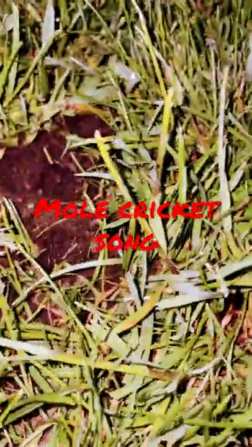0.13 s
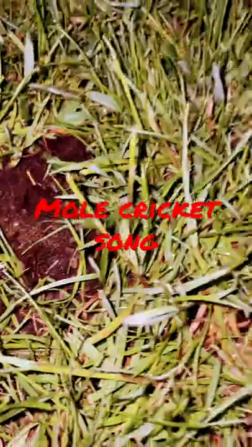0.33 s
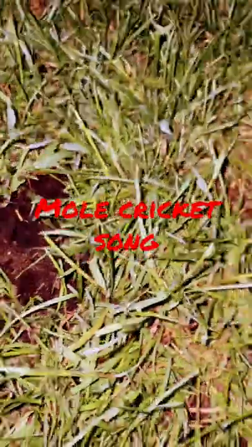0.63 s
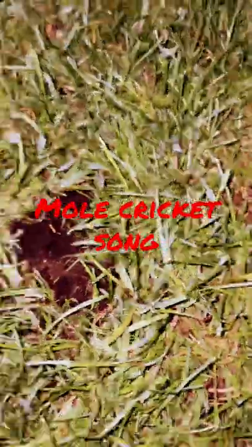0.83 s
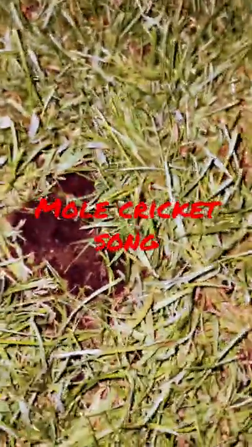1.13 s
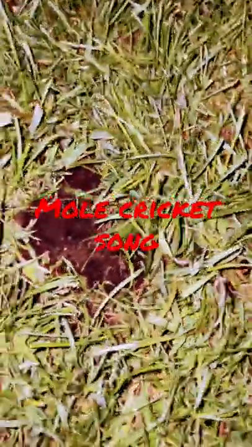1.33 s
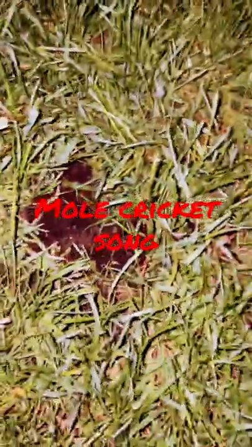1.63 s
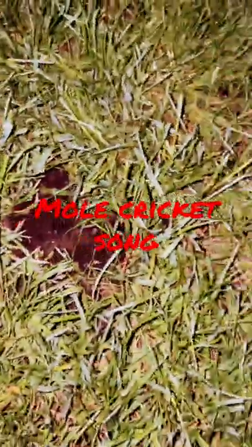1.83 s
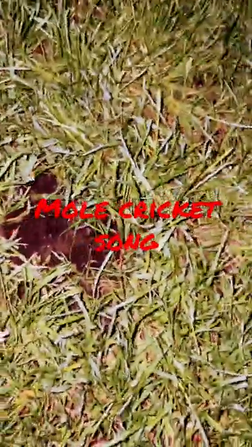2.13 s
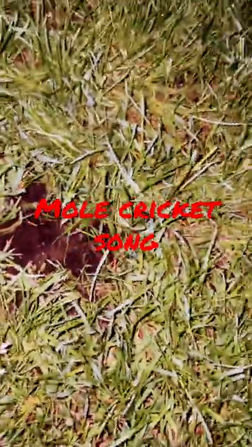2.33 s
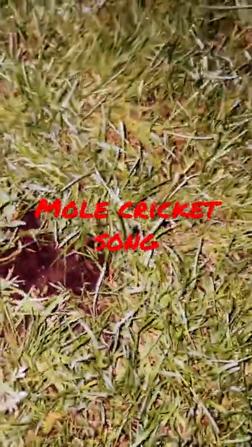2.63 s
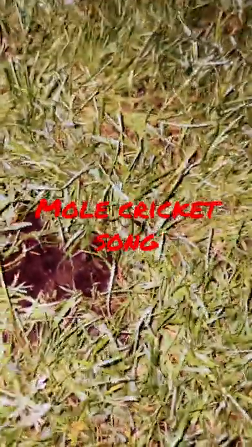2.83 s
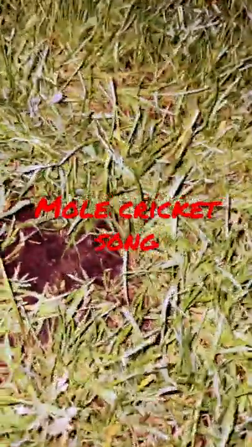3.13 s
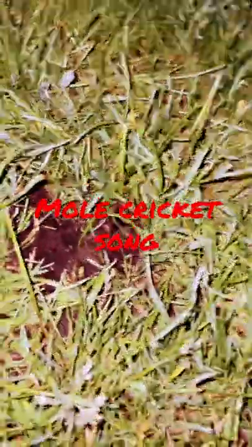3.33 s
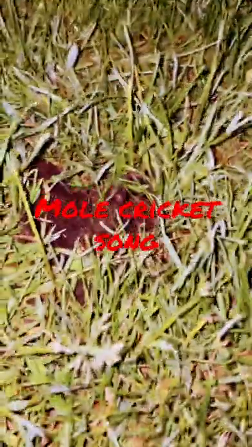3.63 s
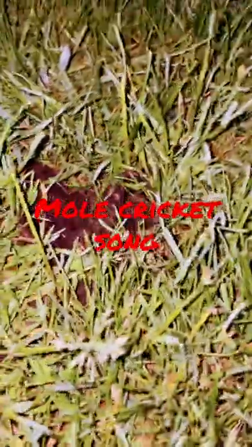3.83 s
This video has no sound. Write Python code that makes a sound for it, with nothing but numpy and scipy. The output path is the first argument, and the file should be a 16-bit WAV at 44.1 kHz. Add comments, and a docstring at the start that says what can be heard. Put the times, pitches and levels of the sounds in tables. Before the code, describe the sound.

A mole cricket churrs a steady mid-pitched buzzing trill from its burrow, then stops short.

```python
"""A mole cricket churrs from its burrow in a lawn, about forty wing strokes a second, and stops short.
Each stroke is a sine at the tooth rate ringing in wing and horn, with overtones, noisy scrape and echo.
Grass swishes close by as dense random snaps; soft footfalls thud as dying sines in the soil.
Far traffic and air are coloured noise, and a faint hum of narrow noise wavers.
A handheld stereo microphone points down at the burrow."""
import sys
import numpy as np
from scipy import signal
from scipy.fft import rfft, irfft
from scipy.io import wavfile
from scipy.ndimage import uniform_filter1d

SR = 44100
rng = np.random.default_rng(int(sys.argv[2]) if len(sys.argv) > 2 else 0)


def wav_out(sig):
    """Save sig, one row per channel (or a flat mono array), as 16-bit PCM at SR to the path in sys.argv[1]."""
    wavfile.write(sys.argv[1], SR, np.round(np.clip(np.atleast_2d(sig).T, -1, 1) * 32767).astype(np.int16))


N = 176400  # samples, 4 s


def amp(db):
    """Turn decibels into an amplitude factor."""
    return 10 ** (np.asarray(db) / 20)


def rms_one(x):
    """Scale a signal to an RMS of 1."""
    return x / np.sqrt(np.mean(x ** 2) + 1e-20)


def at_hz(points):
    """Read a curve of (Hz, value) points at every FFT bin, on a log frequency axis."""
    hz, value = np.transpose(points)
    bin_hz = np.arange(N // 2 + 1) * SR / N
    return np.interp(np.log(bin_hz + 1), np.log(hz), value)


def colour(x, spectrum):
    """Shape white noise to a spectrum, keeping its power."""
    gain = amp(at_hz(spectrum))
    return irfft(rfft(x) * gain / np.sqrt(np.mean(gain ** 2)), N)


def drift(rate):
    """Smooth random wander of RMS 1: noise through two equal one-pole low-passes at this rate in Hz."""
    r = np.exp(-2 * np.pi * rate / SR)
    noise = rng.standard_normal(N + SR)
    return rms_one(signal.lfilter([1], [1, -2 * r, r * r], noise)[SR:])  # the filter settles first


def resonance(x, hz, width_hz):
    """Ring at one frequency: a two-pole band-pass with a peak gain near 1."""
    r = np.exp(-np.pi * width_hz / SR)
    poles = [1, -2 * r * np.cos(2 * np.pi * hz / SR), r * r]
    return signal.lfilter([(1 - r * r) / 2, 0, (r * r - 1) / 2], poles, x)


def stereo(mid, side, pan_db=0):
    """Make left and right from middle and side; pan_db is left over right."""
    return np.array([(mid + side) * amp(pan_db / 2), (mid - side) * amp(-pan_db / 2)])


def scatter(x, t60):
    """A short diffuse echo: convolve with dying noise, partly different in each channel."""
    echo_width = 0.36
    t = np.arange(SR // 5) / SR
    mid, side = rng.standard_normal((2, len(t))) * amp(-60 * t / t60)
    tail = stereo(mid, echo_width * side)
    tail = tail / np.sqrt(np.sum(tail ** 2, axis=1, keepdims=True))
    return signal.fftconvolve(x, tail, axes=1)[:, :N]


def wavering_hum():
    """Noise through two equal narrow resonances, so that level and pitch waver by chance."""
    hum_hz, width_hz, level_db = 383.6, 11, -64.5
    hum = resonance(rng.standard_normal(N), hum_hz, width_hz)
    hum = resonance(hum, hum_hz, width_hz)
    return amp(level_db) * rms_one(hum)


def far_traffic_and_air():
    """Coloured noise rumbles and slowly changes colour, with independent side noise and the hum on top."""
    # Spectra of middle and side: pitch_hz, density_db (relative, per Hz)
    far_mid_spectrum = [(25, -32), (40, -17), (58, 2), (90, -4), (130, -8), (230, -10.5), (330, -15.5),
                        (500, -10.5), (800, -16.5), (1150, -30.5), (1600, -40), (5000, -44.5),
                        (8000, -55.5), (10000, -69.5), (16000, -71)]
    far_side_spectrum = [(20, -24.5), (70, -12), (140, -11), (350, -3.5), (500, -1.5), (800, 0.5),
                         (1150, -5.5), (1500, -18), (4800, -29), (8000, -36.5), (16000, -46)]
    # Change of the rumble's colour by the end: pitch_hz, gain_db
    late_colour = [(60, 0), (110, 0.5), (200, 4.5), (330, 2), (550, -7), (1000, 3.5), (2000, 2)]
    # Lean of the middle to the left: pitch_hz, share (negative leans right)
    left_lean = [(100, 0), (400, -0.14), (800, -.12), (1500, 0.013)]
    mid_db, side_db = -52, -61
    flicker_db, flicker_hz = .35, 4
    level = amp(mid_db + flicker_db * drift(flicker_hz))
    rumble = level * colour(rng.standard_normal(N), far_mid_spectrum)
    recoloured = irfft(rfft(rumble) * amp(at_hz(late_colour)), N)
    rumble = rumble + np.arange(N) / N * (recoloured - rumble)  # crossfade over the whole scene
    mid = rumble + wavering_hum()
    side = amp(side_db) * colour(rng.standard_normal(N), far_side_spectrum)
    side = side + irfft(rfft(mid) * at_hz(left_lean), N)
    return stereo(mid, side)


def footfalls():
    """Dull thuds in the soil: each step sets off three dying sines, the lowest building up latest."""
    # Steps: start_s, level_db, low_delay_s (lag of the lowest mode)
    steps = [(.787, -37, .012), (2.35, -34, .002), (2.859, -50, 0)]
    # Soil modes: pitch_hz, level_db (added to the step's), t60_s, build_up_s
    soil_modes = [(72, 7, .075, 0.014), (275, -3.5, 0.061, 0.001), (640, 2, .02, 0.0013)]
    out = np.zeros(N)
    for start_s, step_db, low_delay_s in steps:
        for hz, mode_db, t60, build_up_s in soil_modes:
            delay_s = low_delay_s * (hz < 100)  # only the lowest mode lags
            t = np.maximum(np.arange(N) / SR - start_s - delay_s, 0)
            envelope = amp(step_db + mode_db - 60 * t / t60) * (1 - np.exp(-(t / build_up_s) ** 2))
            out += envelope * np.sin(2 * np.pi * hz * t)
    return out


def grass_texture():
    """Tiny snaps of blades: random impulses of uneven strength and either sign, blended with noise."""
    # Spectra of middle and side: pitch_hz, density_db (relative, per Hz)
    grass_mid_spectrum = [(1000, -1), (1600, -7.5), (2560, 3), (3400, -2), (4300, -7), (5000, -9.5),
                          (5800, -6.5), (7200, -11), (8200, -23), (9400, -48.5), (14200, -52.5),
                          (15300, -24.5)]
    grass_side_spectrum = [(1000, -6), (1850, -2), (2400, -13.5), (2800, -0.5), (4700, -11.5), (6500, -7),
                           (10300, -7), (12800, -21.5), (14400, -7), (16000, -11.5)]
    snaps_per_s, spread_db, side_db = 5400, 4.5, -1.5
    struck = rng.random((2, N)) < snaps_per_s / SR
    strength = amp(spread_db * np.minimum(rng.exponential(1, (2, N)), 4))
    snaps = struck * strength * rng.choice([-1, 1], (2, N))
    snaps = rms_one(rms_one(snaps) + rng.standard_normal((2, N)))
    side = amp(side_db) * colour(snaps[1], grass_side_spectrum)
    return stereo(colour(snaps[0], grass_mid_spectrum), side)


def grass():
    """Blade snaps swell and fade with each swish over a faint steady bed, in a dull and a bright band."""
    # Swishes: peak_s, rise_s, fall_s, level_db, bright_db (extra in the bright band), pan_db (L-R)
    swishes = [(.79, 0.077, 0.047, -60.5, 0.5, 0), (1.14, 0.052, 0.095, -58, -1.5, 1),
               (1.96, 0.09, 0.23, -60.5, 1, 1.5), (2.302, 0.19, 0.31, -64, 1.5, -1.5),
               (2.561, 0.035, 0.051, -55.5, 2.5, 1), (2.609, 0.027, 0.058, -58.5, 6.5, -0.5),
               (2.72, 0.073, 0.046, -59, -5, 1), (2.814, 0.061, 0.051, -56, 1.5, -1.5),
               (2.9, 0.033, 0.035, -68, 0, 1), (3.15, 0.072, 0.053, -61, 0.5, 1),
               (3.23, 0.043, 0.096, -69.5, -3, 0), (3.49, 0.063, 0.15, -69, 2, 1.5),
               (3.89, 0.035, .05, -73.5, -10, -6)]
    split_hz, bed_db = 4500, -76
    flutter_db, flutter_hz = 1.2, 25
    t = np.arange(N) / SR
    texture = grass_texture()
    high = signal.sosfilt(signal.butter(4, split_hz, "high", fs=SR, output="sos"), texture)
    low = signal.sosfilt(signal.butter(4, split_hz, fs=SR, output="sos"), texture)
    # overlapping swishes add as power
    dull_power, bright_power = np.full((2, 2, N), amp(bed_db) ** 2)
    for peak_s, rise_s, fall_s, level_db, bright_db, pan_db in swishes:
        swell = np.exp(-((t - peak_s) / np.where(t < peak_s, rise_s, fall_s)) ** 2)
        channel_db = level_db + np.array([[pan_db], [-pan_db]]) / 2
        power = swell ** 2 * amp(channel_db) ** 2
        dull_power = dull_power + power
        bright_power = bright_power + power * amp(bright_db) ** 2
    dull_flutter = amp(flutter_db * drift(flutter_hz))
    bright_flutter = amp(flutter_db * drift(flutter_hz))
    return dull_flutter * np.sqrt(dull_power) * low + bright_flutter * np.sqrt(bright_power) * high


def stroke_force(stroke_db, length_s, sag, since, along, jitter_hz):
    """Force of the wing: a shove as the stroke sets off, a sag along it, a quick catch and release."""
    drive_db, shove_db, shove_s, jitter_db = -0.3, 6, .003, .9
    sag_start, sag_end = .1, .72  # shares of the stroke; the sag goes on at the same slope
    attack_s, attack_from = .0022, .15  # force builds from this share
    release_s, release_lead_s = .0018, .0024  # letting go begins this long before the stroke's end
    shove = shove_db * np.exp(-since / shove_s)
    force = amp(stroke_db + drive_db + shove + jitter_db * drift(jitter_hz))
    force = force * np.maximum(1 - sag * np.maximum(along - sag_start, 0) / (sag_end - sag_start), 0)
    attack = 1 - (1 - attack_from) * np.maximum(1 - since / attack_s, 0)
    release = np.clip((length_s + release_s - release_lead_s - since) / release_s, 0, 1)
    return force * attack * release


def tooth_phase(stroke_hz, along, jitter_hz):
    """Phase of the passing teeth: their rate starts a little high, jitters and slows late in the stroke."""
    slowing_hz, slow_from, rate_jitter_hz = 110, .72, 22
    slowing = np.clip((along - slow_from) / (1 - slow_from), 0, 1)
    rate = stroke_hz + slowing_hz * (.06 - slowing) + rate_jitter_hz * drift(jitter_hz)
    return 2 * np.pi * np.cumsum(rate) / SR


def wing_tone(force, phase, stroke_hz, since):
    """The teeth drive the wing resonance, which rings on through the broad horn of the burrow."""
    # Sway of the microphone: time_s, pan_db (L-R)
    sway = [(0.0, 1.5), (0.13, 0.5), (0.45, 2.5), (0.74, 2), (0.81, 1.0), (1.77, 0.5), (1.9, 1.5),
            (2.48, 1.5), (2.5, 2)]
    wing_hz, wing_width_hz, horn_hz, horn_width_hz = 1405, 270, 1150, 1600
    catch_hz, catch_s = 220, 0.0015  # the first teeth catch this much faster, then the extra dies away
    catch = 2 * np.pi * catch_hz * catch_s * np.exp(-since / catch_s)
    detuned = np.hypot(1, 2 * (stroke_hz - wing_hz) / wing_width_hz)  # off-pitch strokes push harder
    wing = resonance(detuned * force * np.sin(phase - catch), wing_hz, wing_width_hz)
    tone = resonance(wing, horn_hz, horn_width_hz)
    return stereo(tone, 0, np.interp(np.arange(N) / SR, *np.transpose(sway)))


def wing_overtones(soft_force, phase, stroke_hz):
    """Faint multiples of the tooth rate, each ringing in a resonance of its own."""
    # Overtones: multiple, level_db (against the force), slope_db_per_hz (of tooth rate),
    # pan_db (L-R), resonance_hz, width_hz
    overtones = [(2, -44, 0.04, -8, 2900, 1200), (3, -31.5, 0, -3, 4300, 420)]
    mean_rate_hz = 1460
    out = np.zeros((2, N))
    for multiple, level_db, slope, pan_db, ring_hz, width_hz in overtones:
        drive = amp(level_db + slope * (stroke_hz - mean_rate_hz)) * soft_force
        out += stereo(resonance(drive * np.sin(multiple * phase), ring_hz, width_hz), 0, pan_db)
    return out


def wing_scrape(soft_force, stroke, stroke_count, since):
    """The rub of the teeth: coloured noise that follows the force, with a sharp bite at the catch."""
    # Spectra of middle and side: pitch_hz, density_db (relative, per Hz)
    scrape_mid_spectrum = [(300, -16), (600, -13.5), (1100, 13), (1800, 10.5), (2550, -2.5), (3300, -1.5),
                           (4000, -4), (4550, -6), (4900, -33.5), (6000, -15), (7700, -16), (8700, -20),
                           (9400, -47.5), (13500, -50), (15200, -23)]
    scrape_side_spectrum = [(500, -10.5), (1800, -5.5), (2330, -15), (3350, -0.5), (4400, -4.5),
                            (5400, -19.5), (5900, -19.5), (7700, 1), (9300, -15), (13200, -23.5),
                            (15100, -7)]
    level_db, side_db, pan_db = -26.5, -11.5, -0.92
    bite_db, bite_s, spread_db = 14, 0.002, 1  # the spread is from stroke to stroke
    lock = 0.75  # part of the side noise that is the middle, a quarter cycle apart
    bite = bite_db * np.exp(-since / bite_s)
    uneven = rng.normal(0, spread_db, stroke_count)[stroke]
    rub = soft_force * amp(level_db + bite + uneven)
    mid_noise, free_noise = rng.standard_normal((2, N))
    quarter_cycle = irfft(1j * rfft(mid_noise), N)
    side_noise = lock * quarter_cycle + np.sqrt(1 - lock ** 2) * free_noise
    side = amp(side_db) * colour(rub * side_noise, scrape_side_spectrum)
    return stereo(colour(rub * mid_noise, scrape_mid_spectrum), side, pan_db)


def mole_cricket():
    """Each stroke drags a row of teeth over the scraper: tone, overtones, scrape and their echoes."""
    # Wing strokes: start_s, level_db (of the force, before shove and drive), tooth_rate_hz (nominal),
    # length_ms, sag (share of force lost by 72 % of the stroke; negative grows)
    strokes = [(-0.0105, -8.5, 1475, 13.27, 0.069), (0.0158, -15, 1481, 12.6, 0.42),
               (0.038, -19, 1485, 13, 0.055), (0.0671, -19.5, 1500, 11.4, -0.41),
               (0.0913, -19.5, 1516, 11.3, -0.022), (0.1161, -18.5, 1442, 12.4, -0.21),
               (0.1412, -16.5, 1397, 11.3, 0.11), (0.1659, -16.5, 1440, 12.8, -0.056),
               (0.1932, -20.5, 1472, 12.5, -0.65), (0.2185, -14, 1396, 17.3, 0.89),
               (0.245, -15.5, 1448, 13.8, 0.59), (0.269, -19.5, 1467, 13.3, -0.41),
               (0.296, -15.5, 1414, 11, 0.1), (0.3203, -17, 1478, 13.3, 0.28),
               (0.347, -18, 1448, 13.4, -0.08), (0.3726, -17.5, 1462, 12.6, 0.26),
               (0.3979, -16.5, 1382, 11.8, 0.28), (0.4229, -16.5, 1474, 13.4, 0.43),
               (0.4468, -20.5, 1488, 13.2, -0.18), (0.472, -18, 1451, 14, 0.22),
               (0.5, -16.5, 1447, 11.9, 0.48), (0.5245, -17, 1405, 10.8, 0.17),
               (0.549, -18, 1441, 12.4, 0.2), (0.5744, -16.5, 1455, 15, 0.73),
               (0.5992, -17.5, 1403, 13.6, 0.62), (0.6246, -16.5, 1446, 11.2, 0.58),
               (0.6495, -15, 1390, 8.6, 0.46), (0.6737, -20, 1482, 11.6, 0.04),
               (0.698, -16, 1431, 11.8, 0.55), (0.7237, -20, 1480, 11.6, -0.02),
               (0.748, -17.5, 1461, 14.7, 0.64), (0.773, -24, 1532, 12.7, -0.57),
               (0.798, -22.5, 1532, 13.5, -0.24), (0.8233, -21, 1539, 13.8, -0.073),
               (0.8478, -19, 1429, 15.8, 0.35), (0.8742, -16.5, 1463, 13.4, 0.44),
               (0.8993, -18, 1403, 13.5, 0.41), (0.9243, -17.5, 1420, 14.6, 0.42),
               (0.9518, -17, 1443, 15.7, 0.78), (0.976, -18.5, 1431, 11.7, -0.0075),
               (1.0023, -19, 1480, 11.5, 0.037), (1.0268, -16, 1420, 14.9, 0.78),
               (1.0531, -19, 1523, 12.2, 0.15), (1.078, -19, 1478, 14.4, 0.13),
               (1.1024, -19.5, 1487, 15.8, 0.14), (1.1272, -17, 1440, 15.6, 0.46),
               (1.1543, -18.8, 1490, 12.7, 0.37), (1.179, -22, 1478, 13.9, -0.49),
               (1.2049, -20, 1454, 13.7, 0.21), (1.2319, -17, 1447, 12.4, 0.39),
               (1.2558, -16, 1407, 14.4, 0.59), (1.2834, -19.5, 1452, 14.2, 0.49),
               (1.3072, -18, 1420, 13.9, 0.48), (1.3341, -16, 1426, 11, 0.52),
               (1.3577, -18, 1435, 14.4, 0.37), (1.3839, -16, 1378, 10.2, 0.4),
               (1.41, -18.5, 1422, 20.3, 0.97), (1.4349, -17.5, 1401, 12.7, 0.31),
               (1.46, -18, 1449, 16, 0.5), (1.487, -18, 1439, 14.2, 0.46), (1.513, -17, 1451, 16, 0.76),
               (1.537, -21, 1483, 13.1, -0.13), (1.563, -21.5, 1533, 12.2, -0.18),
               (1.5877, -18, 1408, 14, 0.56), (1.6153, -20.5, 1482, 12.2, -0.025),
               (1.6387, -19, 1431, 13.65, 0.27), (1.6637, -20, 1432, 12.9, 0.33),
               (1.69, -18, 1474, 11.8, 0.4), (1.7147, -18.8, 1450, 13.3, 0.49),
               (1.7402, -19, 1446, 13.3, 0.35), (1.7662, -22, 1436, 12.5, -0.22),
               (1.7909, -19, 1437, 15.1, 0.51), (1.816, -18.5, 1424, 13.6, 0.58),
               (1.8412, -20, 1450, 12.2, 0.049), (1.8663, -19, 1460, 14.2, 0.38),
               (1.891, -20.5, 1471, 13.8, -0.1), (1.916, -19.5, 1463, 14, 0.33),
               (1.941, -21, 1507, 14.3, 0.057), (1.9653, -19.5, 1464, 14.8, 0.23),
               (1.99, -23, 1454, 13.7, -0.47), (2.016, -19.5, 1465, 16.5, 0.37),
               (2.0399, -19.5, 1431, 15, 0.43), (2.0639, -20, 1459, 14.1, 0.24),
               (2.09, -19.5, 1435, 14.3, 0.35), (2.1167, -19.3, 1453, 14.1, 0.22),
               (2.143, -21.5, 1465, 12.3, -0.21), (2.1674, -19.5, 1458, 12.8, 0.17),
               (2.192, -19.5, 1428, 13.3, 0.36), (2.2181, -19, 1461, 12.7, -0.001),
               (2.2449, -19.5, 1428, 14.3, 0.14), (2.2713, -20, 1465, 14.1, 0.26),
               (2.2976, -17.5, 1438, 13, 0.36), (2.322, -17.5, 1437, 13.5, 0.53),
               (2.3501, -19.5, 1413, 13.3, 0.2), (2.3759, -19.5, 1436, 14.4, 0.27),
               (2.4044, -18.5, 1439, 14.4, 0.41), (2.4324, -18.5, 1428, 14.2, 0.29),
               (2.46, -20, 1426, 12.3, 0.21)]
    creep_s = .0006  # the wing touches this long before the listed start
    jitter_hz = 280  # speed of the jitter in force and tooth rate
    treble_fade_db_per_s = 2.5  # overtones and scrape dull as the microphone draws back
    tone_echo_db, tone_echo_t60_s = -23, .08  # scattered back by soil and grass
    scrape_echo_db, scrape_echo_t60_s = -7, 0.19
    start, level_db, hz, length_ms, sag = np.transpose(strokes)
    start = start - creep_s
    t = np.arange(N) / SR
    stroke = np.searchsorted(start, t, side="right") - 1  # latest stroke at each sample
    since = t - start[stroke]
    along = since * 1e3 / length_ms[stroke]  # 0 to 1 over the stroke
    stroke_hz = hz[stroke]
    force = stroke_force(level_db[stroke], length_ms[stroke] / 1e3, sag[stroke], since, along, jitter_hz)
    phase = tooth_phase(stroke_hz, along, jitter_hz)
    phase = phase + rng.uniform(0, 2 * np.pi, len(start))[stroke]  # each stroke starts anywhere
    soft_force = uniform_filter1d(force, size=40) * amp(-treble_fade_db_per_s * t)
    tone = wing_tone(force, phase, stroke_hz, since)
    overtones = wing_overtones(soft_force, phase, stroke_hz)
    scrape = wing_scrape(soft_force, stroke, len(start), since)
    tone_echo = amp(tone_echo_db) * scatter(tone, tone_echo_t60_s)
    scrape_echo = amp(scrape_echo_db) * scatter(scrape, scrape_echo_t60_s)
    return tone + overtones + scrape + tone_echo + scrape_echo


def scene():
    """Mix the background, the thuds, the lawn and the cricket."""
    return far_traffic_and_air() + footfalls() + grass() + mole_cricket()


def record(dry):
    """Cut the top with a steep elliptic low-pass."""
    cutoff_hz = 15750
    return signal.sosfilt(signal.ellip(12, .5, 70, cutoff_hz, fs=SR, output="sos"), dry)


dry = scene()
out = record(dry)
wav_out(out)
```